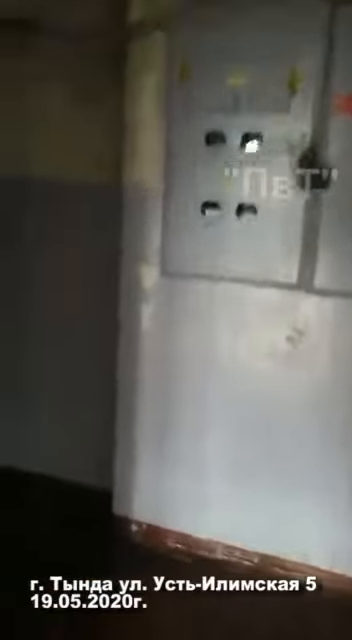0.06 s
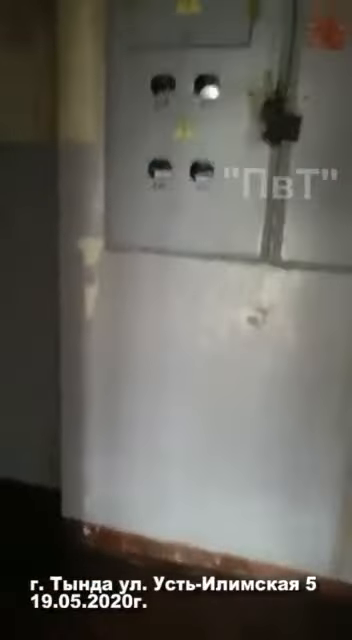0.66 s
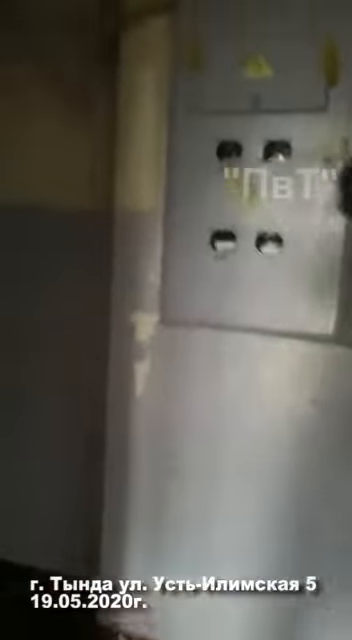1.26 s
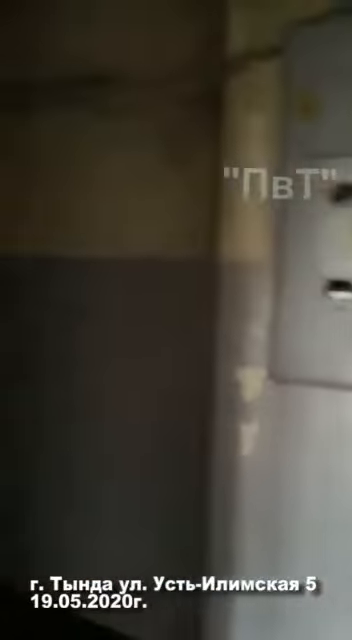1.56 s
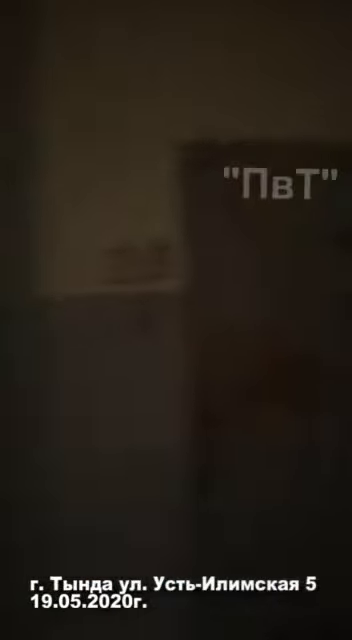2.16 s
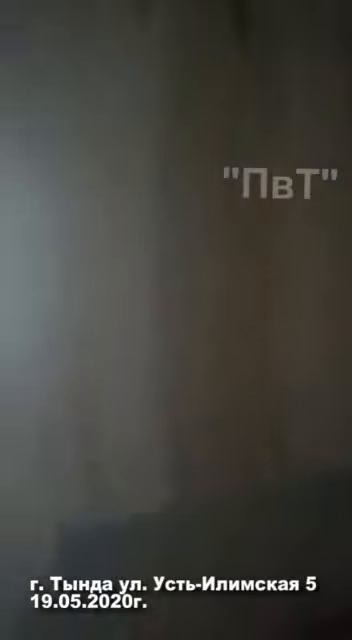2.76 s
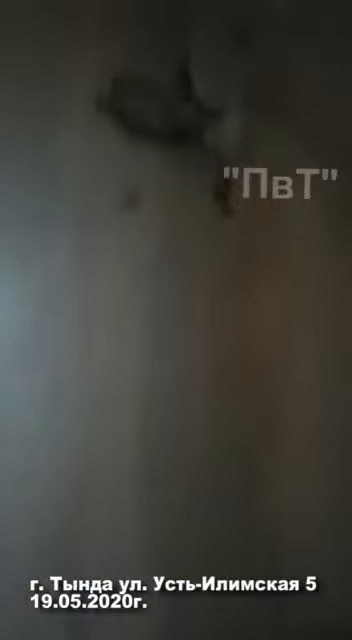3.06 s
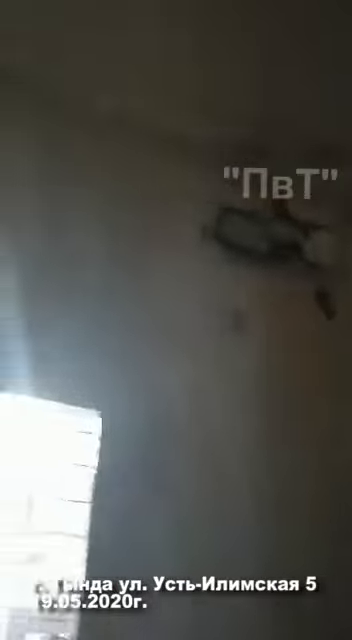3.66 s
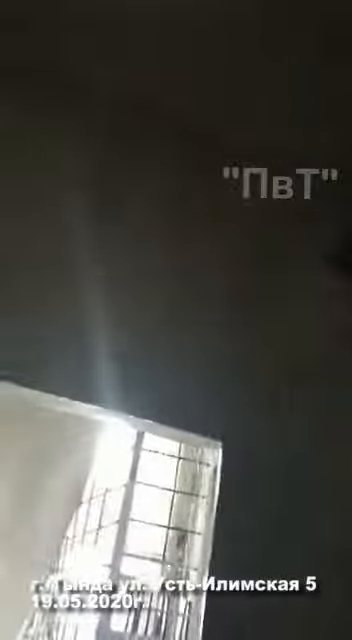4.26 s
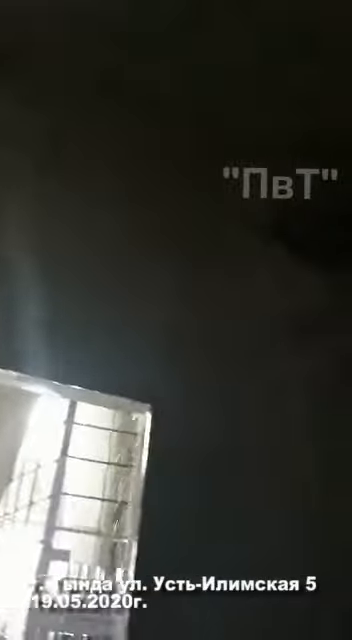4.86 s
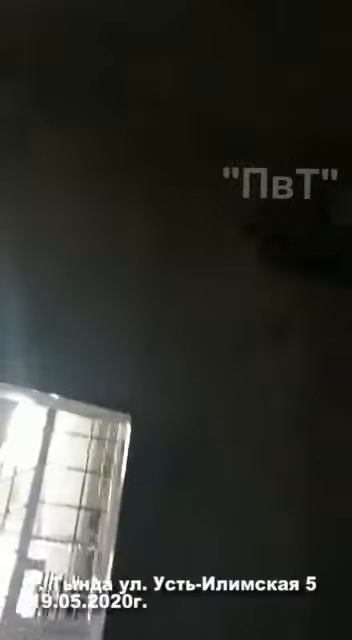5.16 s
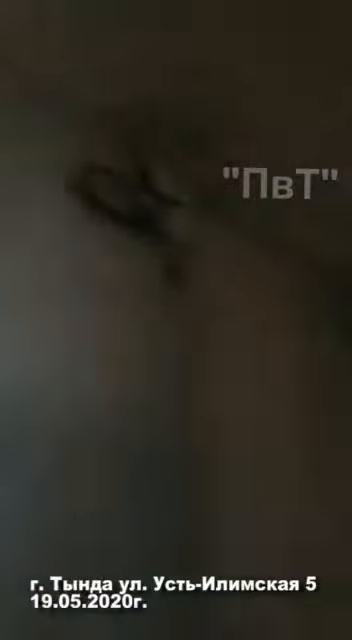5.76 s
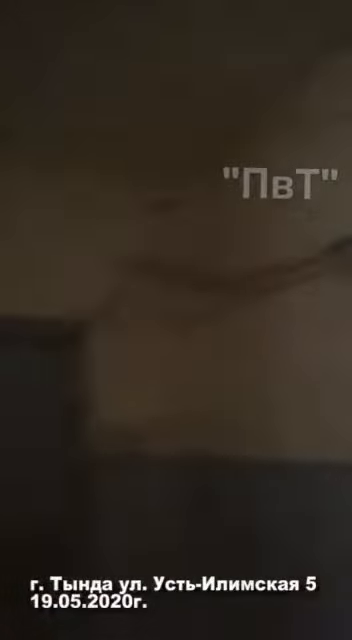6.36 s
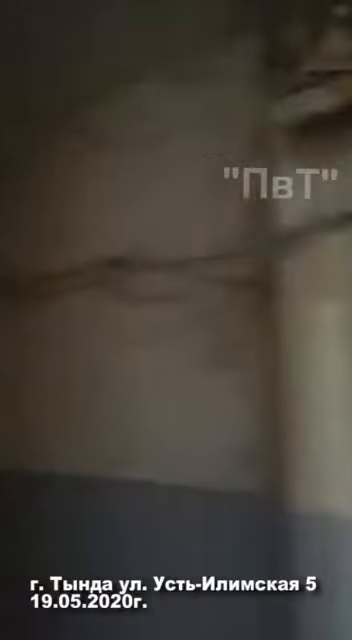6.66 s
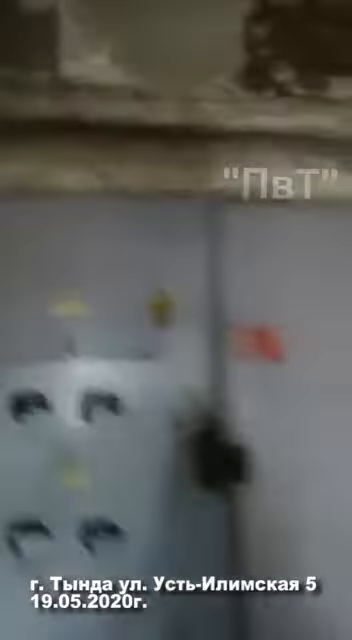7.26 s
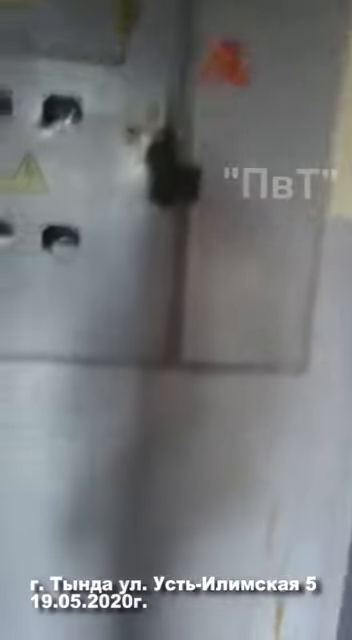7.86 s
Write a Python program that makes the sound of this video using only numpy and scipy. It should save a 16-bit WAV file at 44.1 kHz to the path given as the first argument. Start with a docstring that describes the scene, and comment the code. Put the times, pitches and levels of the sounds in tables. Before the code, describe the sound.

Water pours through the ceiling of a bare concrete stairwell, a steady hissing patter with irregular gushes slapping into puddles. A few big drops crack close by at the start, then one hollow thump rings out. Halfway through, the water runs harder. Near the end, air briefly rumbles on the hand-held microphone as it swings round. The building hums faintly underneath.

```python
"""A bare concrete stairwell, heard on a hand-held stereo microphone with two spaced ports.
From the start rainwater pours through the ceiling: drops patter, spray and churn the puddles, gushes
slap down, and the building drones faintly behind. At 0.3 s the first big drops crack close by.
At 1.6 s one hollow thump rings through the stairs. From about 4 s the water runs harder.
Air buffets the microphone as it swings round, lightly at 2.4 s and most strongly around 7 s."""
import sys
import numpy as np
from scipy import signal
from scipy.fft import rfft, irfft
from scipy.io import wavfile
from scipy.ndimage import map_coordinates

SR = 44100
rng = np.random.default_rng(int(sys.argv[2]) if len(sys.argv) > 2 else 0)


def to_wav(sig):
    """Store sig (one row per channel, or 1-D mono) as 16-bit WAV at the path in sys.argv[1].

    Samples outside -1..1 are clipped; the rate is SR.
    """
    pcm = np.clip(np.atleast_2d(sig), -1, 1) * 32767
    pcm = np.round(pcm).astype(np.int16)
    wavfile.write(sys.argv[1], SR, pcm.T)  # frames by channels


N = 358019
TIME = np.arange(N) / SR
FREQ = np.maximum(np.arange(N // 2 + 1) * SR / N, 1)

# how hard the water runs, heard as its patter: (time [s], level [dB])
WATER_FLOW = [(0, -29.5), (.6, -28), (1.4, -28.5), (1.8, -28), (2.4, -28.5), (2.8, -27), (3.45, -29),
              (4.05, -28.5), (4.32, -25), (5.6, -26), (6.3, -27), (6.9, -24.5), (7.45, -27), (8.12, -26)]
# water falling into the puddles: (time [s], level [dB])
PUDDLE_LEVEL = [(0, -35.5), (1.4, -37.5), (2.4, -37), (3.5, -37.5), (5.5, -35), (7.5, -33), (8.12, -36.5)]
# drops on concrete: (frequency [Hz], relative level [dB])
PATTER_SPECTRUM = [(500, -34), (1200, -22), (2000, -8), (2700, -2), (3300, 1), (4800, -4.5), (6500, -11),
                   (9000, -14), (13000, -48)]
# fine spray: (frequency [Hz], relative level [dB])
SPRAY_SPECTRUM = [(2000, -52), (4000, 2), (6000, 2), (8000, -0.5), (10000, 4), (11500, 4.5), (12400, 2.5),
                  (13200, -5)]
# churned puddles: (frequency [Hz], relative level [dB])
PUDDLE_SPECTRUM = [(100, -19.5), (220, -4.5), (400, -3.5), (580, -6), (750, -1), (950, 1), (1400, 1),
                   (2000, -2.5), (3200, -14)]
# gushes that slap down and throw up spray:
# (time [s], slap level [dB], centre [Hz], width [octaves], fall time [s], spray level [dB])
GUSH_SLAPS = [(0, -22.5, 3180, 0.67, 0.1, -21), (.268, -19.5, 5200, 1, 0.09, -22),
              (.48, -25, 2630, 0.65, .14, -32), (.743, -25, 3430, 0.73, 0.064, -34),
              (.845, -17.5, 2590, 1, 0.049, -27), (1.217, -33, 3500, 1, 0.065, -22.5),
              (1.318, -34, 1040, 0.21, 0.037, -40), (1.75, -23, 2630, 0.55, 0.15, -45),
              (1.936, -18.5, 3520, 0.47, 0.057, -23), (2.193, -21, 8500, .6, 0.071, -27),
              (2.57, -21.5, 3340, .7, 0.17, -23), (2.745, -24, 4200, 1.3, 0.048, -19),
              (2.921, -32, 2100, 0.2, .05, -23.5), (2.975, -23.5, 2580, 0.51, 0.097, -39),
              (3.085, -22, 10700, .3, 0.054, -26), (3.489, -22.5, 7400, 0.42, 0.24, -25),
              (4.114, -20, 3140, .7, .11, -22), (4.179, -23, 4500, .8, 0.042, -21),
              (4.305, -21, 4000, 0.53, .05, -26), (4.55, -18.5, 3260, 0.67, 0.073, -22),
              (4.925, -25, 10500, .4, 0.17, -26), (4.985, -19, 3560, 0.61, .1, -32),
              (5.352, -16.5, 3110, .3, 0.14, -29), (5.48, -23, 3830, 1.3, 0.2, -23.5),
              (5.58, -20, 4200, .5, 0.046, -22), (5.675, -21.5, 2230, 0.4, 0.094, -22),
              (6.573, -18, 3340, 0.46, .1, -31), (6.749, -17, 3850, 0.54, 0.12, -27),
              (6.868, -20.5, 11100, 0.23, 0.083, -35), (7.195, -24, 2950, 0.81, 0.22, -23),
              (7.575, -23, 2720, 0.73, 0.36, -26), (7.882, -16.5, 2660, 0.78, 0.26, -36)]
# low resonances of the building: (frequency [Hz], width [Hz], level [dB])
BUILDING_MODES = [(82.3, 3.5, -69), (136, 36, -65.5), (212.5, 28, -64.5), (100, 120, -62)]
# swells of the building's hum: (time [s], level [dB], hold [s])
HUM_RISES = [(1.55, -56, 0.32), (3.298, -53.5, 0.32), (4.15, -52.5, .35), (4.745, -55.5, 1.26)]
# single drops close to the microphone: (time [s], level [dB], centre [Hz])
CLOSE_DROPS = [(0.2685, -7, 6200), (0.2789, -10, 5500), (.2826, -17, 5000), (0.856, -18, 3500),
               (5.5847, -17, 5040)]
# what rings in the thump: (frequency [Hz], width [Hz], relative level [dB])
HOLLOW_MODES = [(140, 38, -20), (295, 130, -5), (860, 410, -12), (1340, 270, 2.5), (1560, 520, -3.5),
                (3770, 4300, -3)]
# eddies that push on the microphone: (time [s], level [dB], hold [s], fall time [s])
EDDIES = [(2.41, -45, 0.17, .03), (6.793, -31, .22, 0.046), (7.03, -27.5, 0.13, 0.15), (7.6, -47, .3, .2)]
# their rumble: (frequency [Hz], relative level [dB])
EDDY_SPECTRUM = [(15, -17), (35, 0.5), (60, 2), (110, -0.5), (170, -10), (240, -11), (400, -44), (800, -60)]
# balance of the microphone's ports: (frequency [Hz], left minus right [dB])
PORT_BALANCE = [(100, 0), (1000, 0.2), (2000, -0.2), (4000, 1.5), (5600, 1), (8000, 2), (10000, 9),
                (13000, 4)]

GUSH_RISE_SHARE = 0.051  # of its fall time: long gushes also build up slowly


def undb(db):
    """Decibels to gain."""
    return 10 ** (np.asarray(db) / 20)


def unit(x):
    """Scale to rms 1."""
    return x / np.sqrt(np.mean(x ** 2))


def bins(size):
    """Frequencies of a spectrum of this many samples."""
    return np.maximum(np.arange(size // 2 + 1) * SR / size, 1)


def curve(rows):
    """Gain over time from (time [s], level [dB]) points."""
    return undb(np.interp(TIME, *np.transpose(rows)))


def colour(points):
    """Gain over frequency from (frequency [Hz], level [dB]) points."""
    hz, db = np.transpose(points)
    return undb(np.interp(np.log(FREQ), np.log(hz), db))


def resonance(hz, width, freq=FREQ):
    """Complex response of one damped mode."""
    return 1 / (1 + 1j * (freq ** 2 - hz ** 2) / (freq * width))


def shape(x, response):
    """Filter by a frequency response; rms 1."""
    return unit(irfft(rfft(x) * response, x.shape[-1]))


def swell(s, rise_s, hold_s, fall_s, size=N):
    """Attack, hold and exponential release, starting at time s."""
    age = np.maximum(TIME[:size] - s, 0)
    return (1 - np.exp(-age / rise_s)) * np.exp(-np.maximum(age - hold_s, 0) / fall_s)


def wander(per_s):
    """Smooth random motion with a spread of about 1."""
    knots = rng.standard_normal(400)
    return map_coordinates(knots, [TIME * per_s], order=2, mode="mirror")


def fading(x, fall_s):
    """Each input lingers and dies away exponentially; the mean is kept."""
    keep = np.exp(-1 / (fall_s * SR))
    return signal.lfilter([1 - keep], [1, -keep], x - x.mean()) + x.mean()


def add(out, s, x):
    """Mix a sound in at time s."""
    start = int(s * SR)
    out[:, start:start + x.shape[1]] += x[:, :N - start]


def two_ports(x, spacing_s=.0006):
    """Sound from all round reaches two spaced ports: long waves alike, short ones unrelated."""
    freq = bins(x.shape[1])
    alike = np.cos(2 * np.pi * freq * spacing_s) / (1 + (freq / 500) ** 1.5)
    mid, side = irfft(rfft(x) * np.sqrt([1 + alike, 1 - alike]), x.shape[1])
    return np.array([mid + side, mid - side])


def diffuse_noise(size=N):
    """White noise arriving at the microphone from all round."""
    return two_ports(rng.standard_normal((2, size)))


def stairwell(x, wet_db, t60_s=0.9, treble_t60_s=0.28, split_hz=2500):
    """Direct sound plus the dense echo of concrete walls, whose treble dies first."""
    t = TIME[:SR]
    noise = diffuse_noise(SR)
    low = signal.sosfilt(signal.butter(2, split_hz, fs=SR, output="sos"), noise)
    high = signal.sosfilt(signal.butter(2, split_hz, "high", fs=SR, output="sos"), noise)
    tail = low * 1000 ** (-t / t60_s) + high * 1000 ** (-t / treble_t60_s)
    tail = unit(tail * np.minimum(t / 0.0043, 1)) / np.sqrt(SR)
    mono = x.sum(axis=0, keepdims=True) / np.sqrt(2)
    echo = signal.fftconvolve(mono, tail, axes=1)[:, :N]
    return (x + undb(wet_db) * echo) / np.hypot(1, undb(wet_db))


def impacts(per_s, spread_db, size=N):
    """Random drop impacts at each port: many small, a few large."""
    hit = rng.random((2, size)) < per_s / SR
    strength = undb(spread_db * np.minimum(rng.exponential(size=(2, size)), 6))
    return unit(hit * strength * rng.choice([-1, 1], (2, size)))


def shower(per_s, spread_db, wet_db, clumping, clumps_per_s=30, clump_s=0.014, echo_s=0.17):
    """Impacts that bunch into small splashes; each lands elsewhere, so their echoes merge into a hiss."""
    splashes = rng.random(N) < clumps_per_s / SR
    clumps = fading(splashes * SR / clumps_per_s, clump_s)
    hits = impacts(per_s, spread_db) * np.sqrt(1 + clumping * np.maximum(clumps, 0))
    echo_power = np.maximum(fading(hits ** 2, echo_s), 0)
    echo = rng.standard_normal((2, N)) * np.sqrt(echo_power)
    return hits + undb(wet_db) * echo


def spatter(drops, points, flicker_db, flicker_hz):
    """Colour a shower; the stream breaks up unevenly, so each drop size flickers by itself."""
    spectrum = rfft(drops) * colour(points)
    out = 0
    for octave in np.arange(9, 14.5, .5):  # half-octave bands from 512 Hz up
        band = np.maximum(1 - 2 * np.abs(np.log2(FREQ) - octave), 0)
        out = out + irfft(spectrum * band, N) * undb(flicker_db * wander(flicker_hz))
    return unit(out)


def patter():
    """Countless drops strike the wet concrete around the microphone."""
    drops = shower(per_s=1900, spread_db=1.5, wet_db=-1, clumping=0.067)
    return spatter(stairwell(drops, wet_db=0.5), PATTER_SPECTRUM, flicker_db=2.0, flicker_hz=21.5)


def bubbles(low_hz=2500, high_hz=6500, decay_cycles=16, glide=0.0367, count=1400):
    """Tiny pockets of trapped air ring for a few milliseconds, rising in pitch as they surface."""
    out, t = np.zeros((2, N)), TIME[:1536]
    for when, pitch, loud, side in rng.random((count, 4)):
        cycles = low_hz * (high_hz / low_hz) ** pitch * t
        age = cycles / decay_cycles
        rise = 1 + glide * np.minimum(age, 6) / 2
        ring = np.sin(2 * np.pi * cycles * rise) * np.exp(-age)
        pan = np.sqrt([[side], [1 - side]])
        add(out, when * N / SR, pan * ring * undb(np.log(loud + 0.007)))
    return unit(stairwell(out, wet_db=0))


def spray(flow, above_flow_db=1.67):
    """Drops burst into a fine hiss that follows the flow; every gush throws up more."""
    droplets = shower(per_s=6000, spread_db=0.5, wet_db=0.5, clumping=0.34)
    hiss = spatter(droplets, SPRAY_SPECTRUM, flicker_db=1.3, flicker_hz=18)
    power = (undb(above_flow_db) * flow) ** 2
    for s, _, _, _, fall_s, spray_db in GUSH_SLAPS:
        power += (undb(spray_db) * swell(s, GUSH_RISE_SHARE * fall_s, 0, fall_s)) ** 2
    return hiss * np.sqrt(power)


def puddles():
    """Falling water churns the puddles, lower in pitch than the patter."""
    drops = shower(per_s=1200, spread_db=3.5, wet_db=2.5, clumping=0.35)
    return shape(two_ports(drops), colour(PUDDLE_SPECTRUM)) * curve(PUDDLE_LEVEL)


def gushes(size=24576):
    """A slug of water lands as a quickly fading burst of impacts."""
    out = np.zeros((2, N))
    for s, db, hz, octaves, fall_s, _ in GUSH_SLAPS:
        band = 1 / (1 + (np.log2(bins(size) / hz) / octaves) ** 2 / 2) ** 2
        slap = shape(impacts(per_s=3500, spread_db=2, size=size), band)
        add(out, s, undb(db) * slap * swell(0, GUSH_RISE_SHARE * fall_s, 0, fall_s, size))
    return stairwell(out, wet_db=-3.5)


def drone(hum_hz=66.4, waver_hz=0.58, rest_db=-65):
    """In the background the building's low resonances murmur around a hum that swells now and then."""
    noise = diffuse_noise()
    murmur = sum(undb(db) * shape(noise, resonance(hz, width) ** 2) for hz, width, db in BUILDING_MODES)
    swells = sum(undb(db) * swell(s, .07, hold_s, fall_s=0.062) for s, db, hold_s in HUM_RISES)
    pitch_hz = hum_hz + waver_hz * wander(per_s=3.2)
    hum = np.sqrt(2) * np.sin(2 * np.pi * np.cumsum(pitch_hz) / SR)
    return murmur + hum * np.hypot(undb(rest_db), swells)


def close_drops(fall_s=.0012, size=512):
    """Big drops burst in about a millisecond, so near the microphone that they are almost dry."""
    out = np.zeros((2, N))
    burst = np.exp(-TIME[:size] / fall_s)
    for s, db, hz in CLOSE_DROPS:
        snaps = rng.choice([-1., 1.], (2, size))  # one drop's spray: a run of equally strong snaps
        crack = shape(snaps, resonance(hz, hz, bins(size)))
        add(out, s, undb(db) * crack * burst)
    return stairwell(out, wet_db=-18)


def thump(at_s=1.564, level_db=-16.5):
    """A soft, wet blow on something hollow; the stairwell holds its ring."""
    body = sum(undb(db) * np.abs(resonance(hz, width)) ** 2 for hz, width, db in HOLLOW_MODES)
    ring = shape(diffuse_noise(), body)
    blow = swell(at_s, rise_s=0.0082, hold_s=0, fall_s=0.052)
    return stairwell(undb(level_db) * ring * blow / blow.max(), wet_db=-4.5)


def buffet(rise_s=0.0085, flutter_db=2.2):
    """Eddies rumble and flutter right on the moving microphone."""
    push = sum(undb(db) * swell(s, rise_s, hold_s, fall_s) for s, db, hold_s, fall_s in EDDIES)
    flutter = undb(flutter_db * wander(per_s=26))
    return shape(diffuse_noise(), colour(EDDY_SPECTRUM)) * push * flutter


def scene():
    """All that reaches the microphone in the stairwell."""
    flow = curve(WATER_FLOW)
    leak = (patter() + undb(-8.5) * bubbles()) * flow + spray(flow) + puddles()
    return leak + gushes() + drone() + close_drops() + thump() + buffet()


def record(dry, top_hz=13150):
    """The microphone's right port is duller than its left; the top is cut steeply."""
    lean = colour(PORT_BALANCE)
    ports = np.array([lean, np.ones_like(lean)]) / np.sqrt((1 + lean ** 2) / 2)
    top_cut = signal.ellip(12, .2, 90, top_hz, fs=SR, output="sos")
    return signal.sosfilt(top_cut, irfft(rfft(dry) * ports, N))


dry = scene()
out = record(dry)
to_wav(out)
```